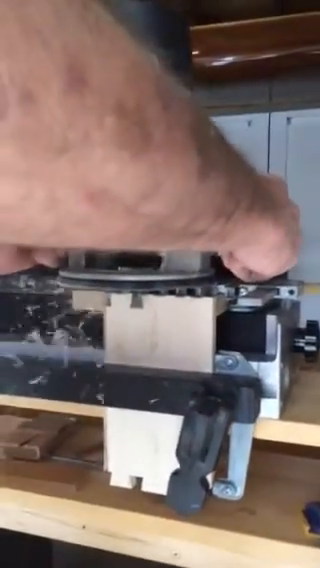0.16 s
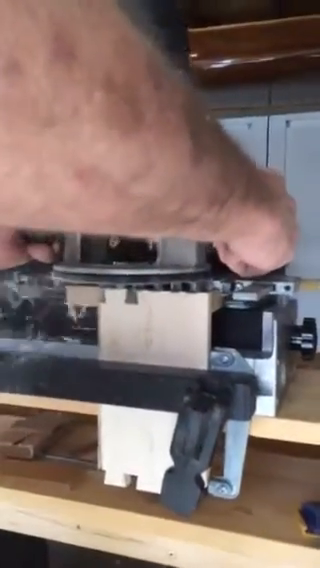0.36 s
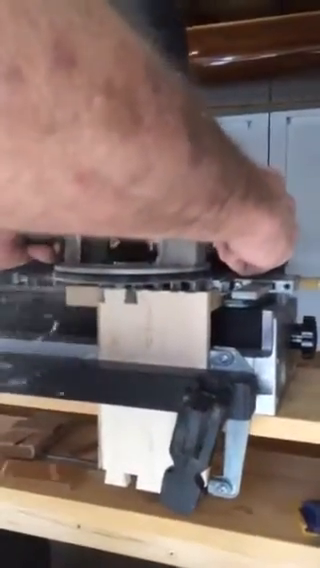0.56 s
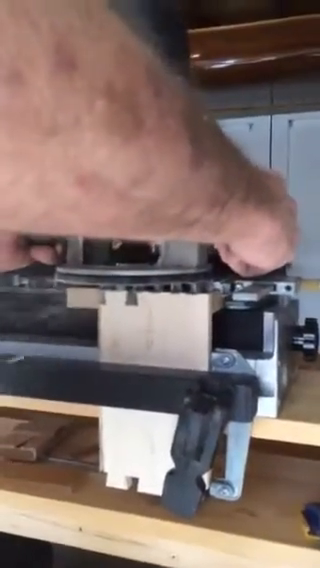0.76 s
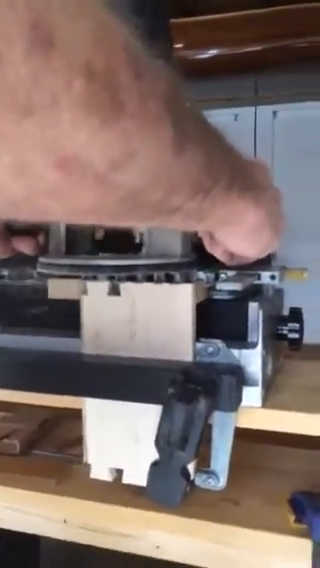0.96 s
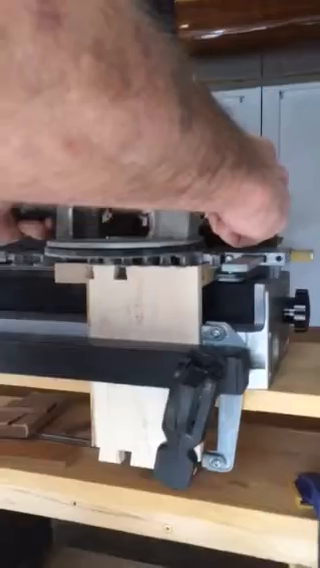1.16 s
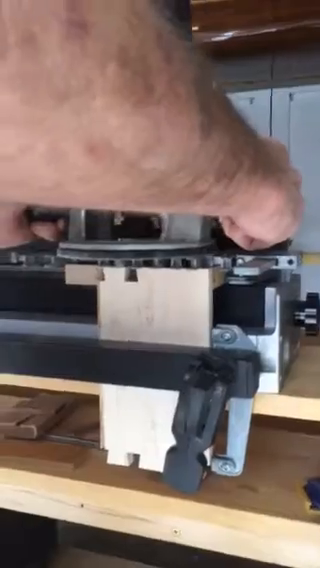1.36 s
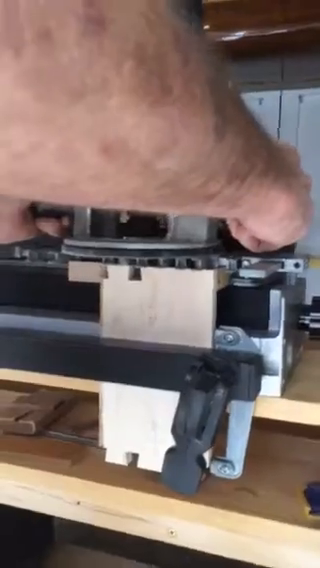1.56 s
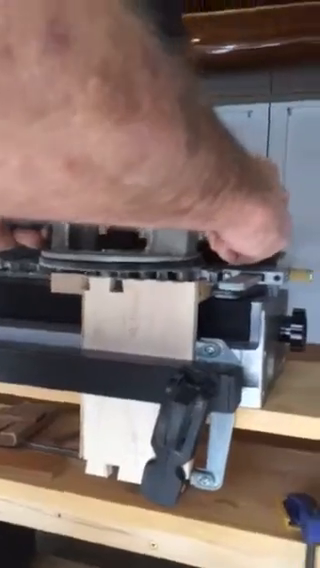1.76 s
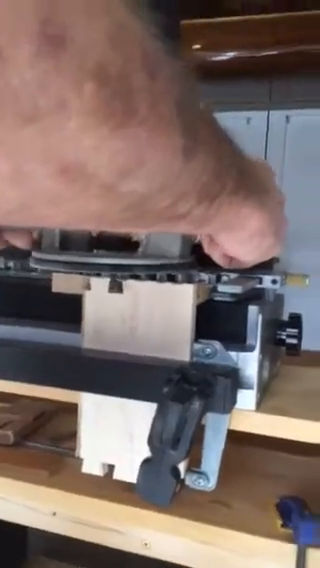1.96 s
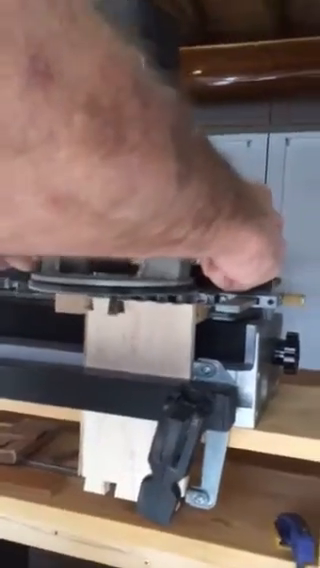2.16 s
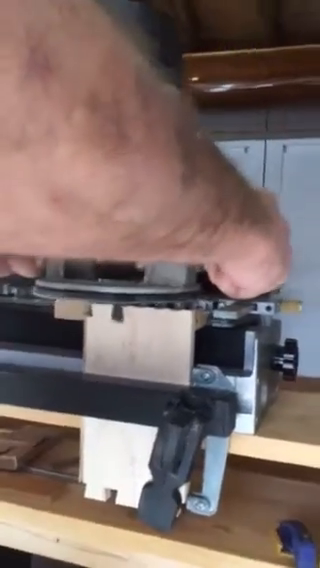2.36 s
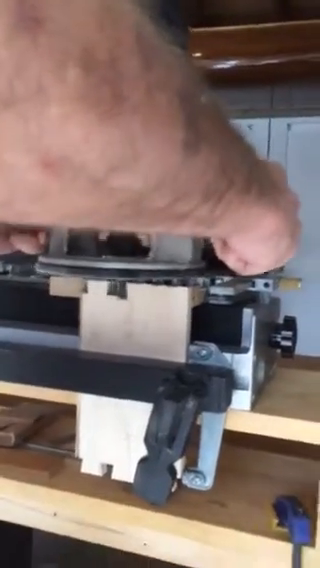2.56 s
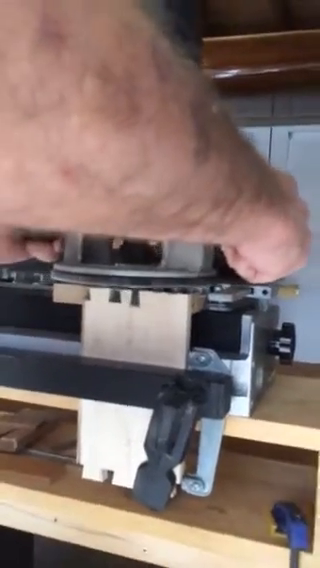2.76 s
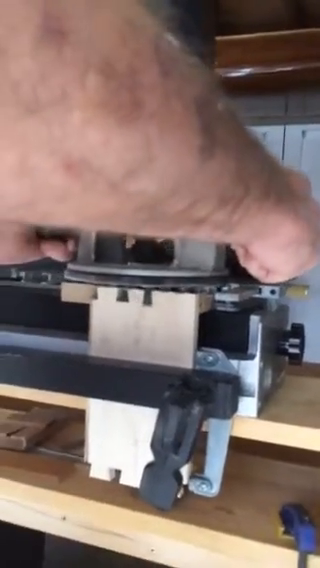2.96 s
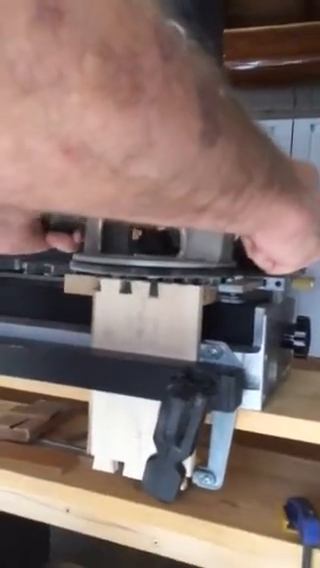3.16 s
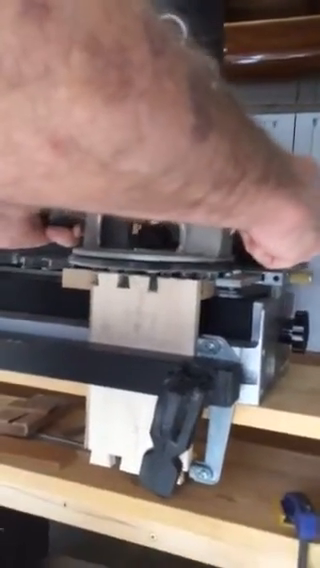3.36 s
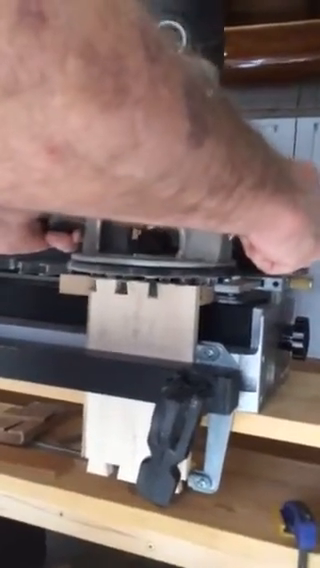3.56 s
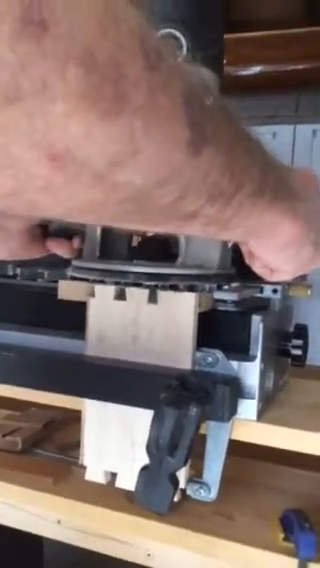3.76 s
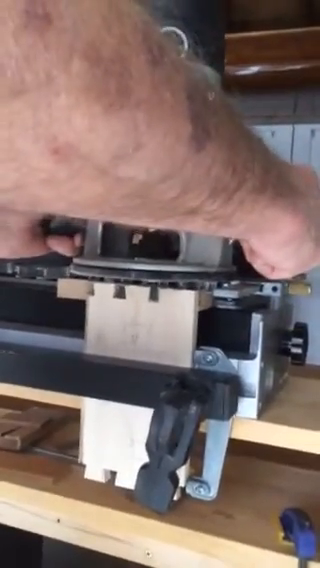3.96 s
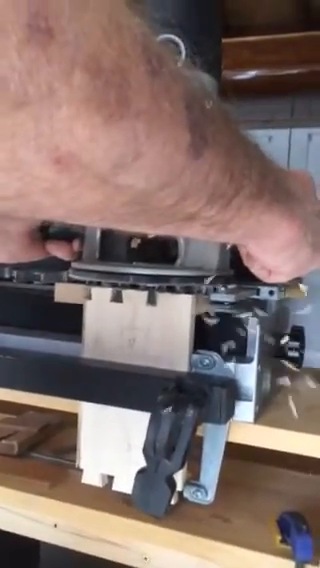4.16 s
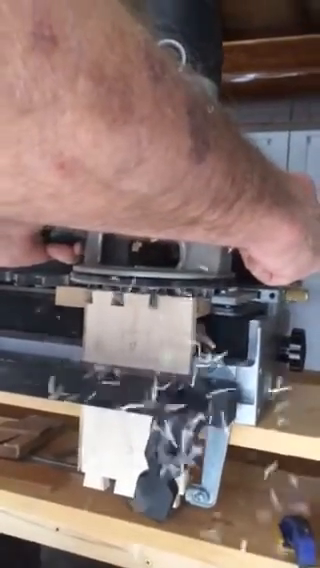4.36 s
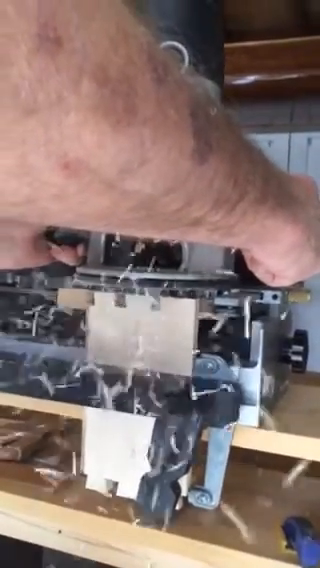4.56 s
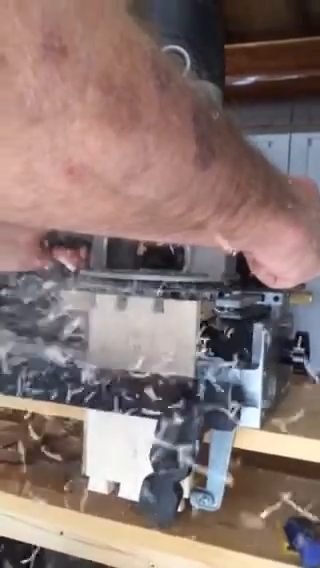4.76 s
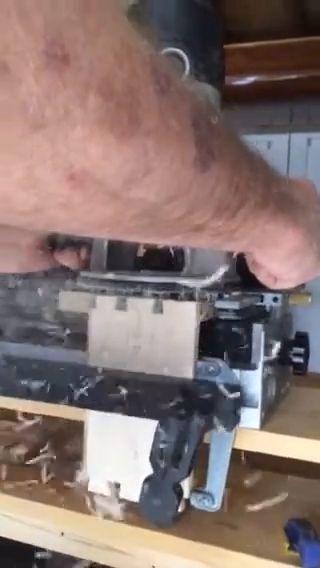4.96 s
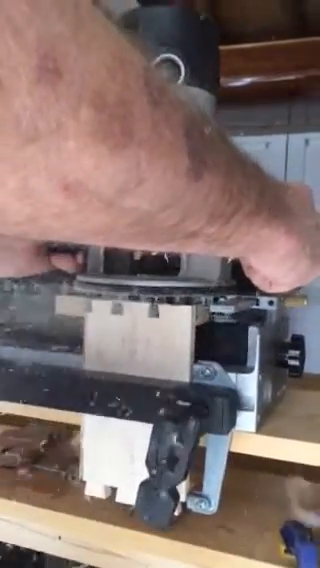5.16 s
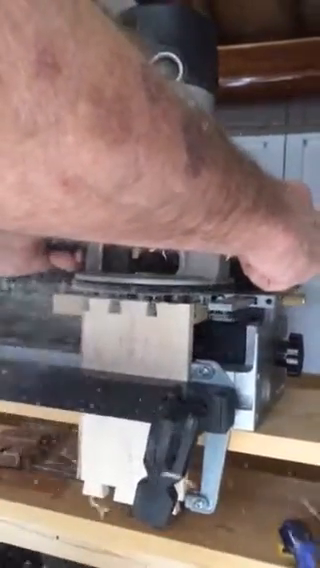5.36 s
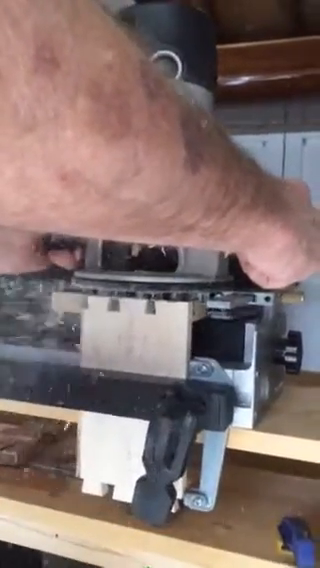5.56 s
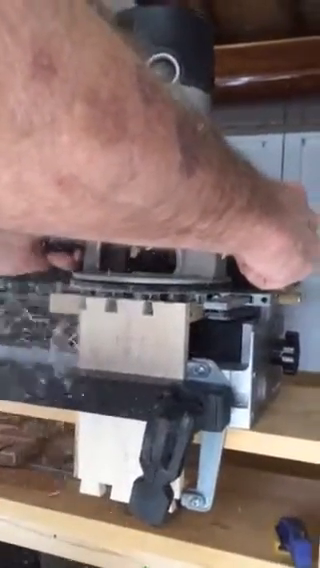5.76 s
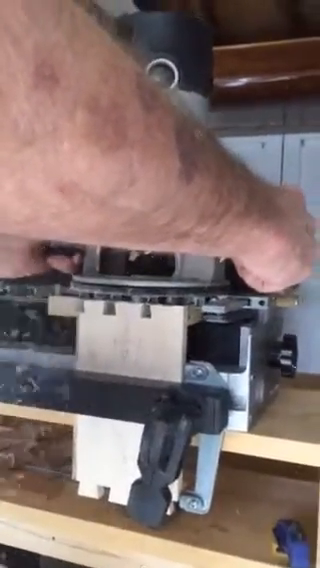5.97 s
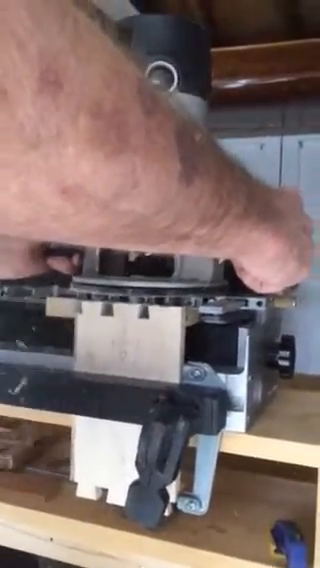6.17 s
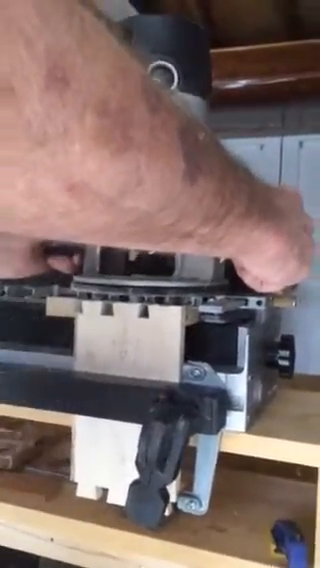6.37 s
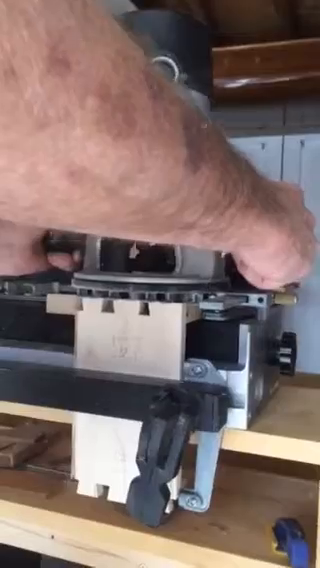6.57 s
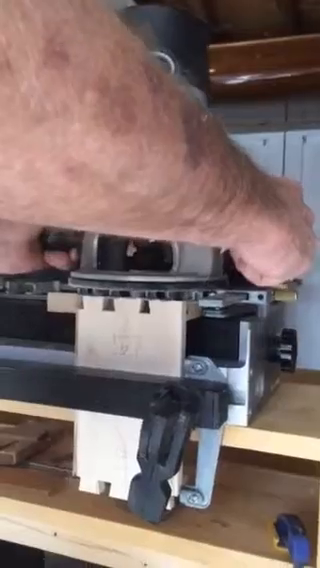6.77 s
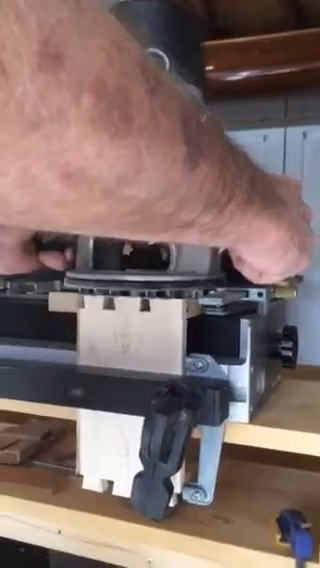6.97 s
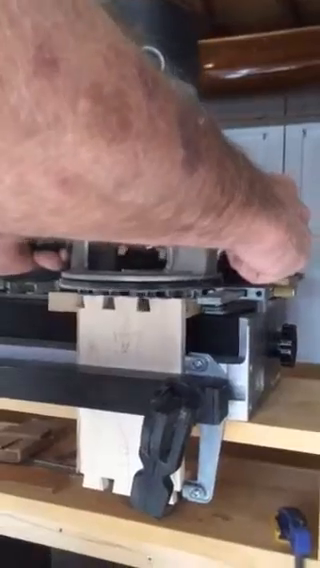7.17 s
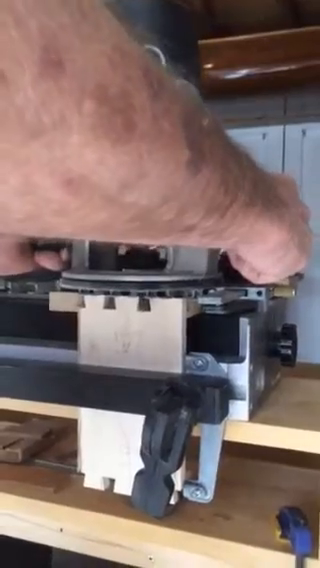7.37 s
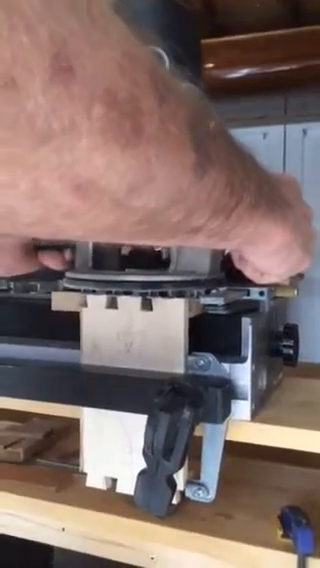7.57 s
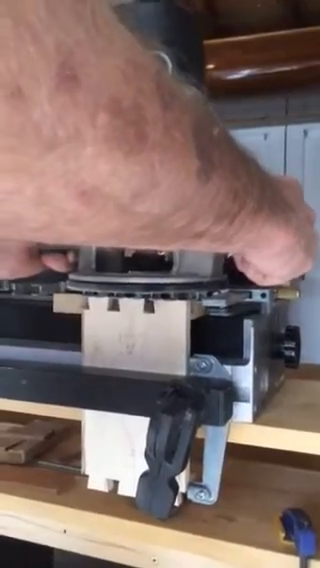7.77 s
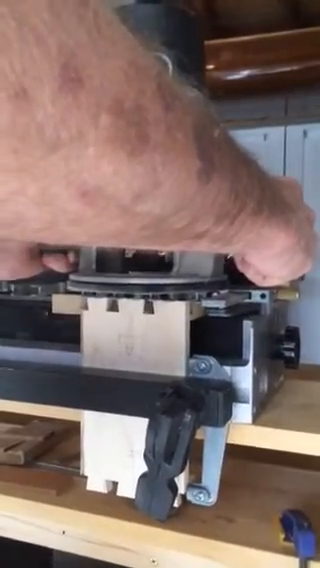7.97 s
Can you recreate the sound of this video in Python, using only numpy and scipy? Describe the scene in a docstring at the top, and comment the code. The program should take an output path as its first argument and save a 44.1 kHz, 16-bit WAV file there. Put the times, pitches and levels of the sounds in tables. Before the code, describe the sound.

Close in a small workshop, a handheld router runs at full speed, with rushing air and a high fan whistle. Light cuts buzz and rasp at first, then it idles with one brief graze. Past the middle the bit digs deep: the motor sags and a harsh, rattling squeal swells and breaks up. A short squeak, scrape and dull bump end the cut, and the steady whine returns. Phone microphone, dry and slightly compressed.

```python
"""A handheld router cuts slots in a clamped board: the shaft turns at up to 488 Hz and every tone follows its angle.
Air roars through the housing as filtered noise; unbalance hums once a turn and a 17-blade fan whistles.
Light cuts with the two-flute bit buzz at multiples of the shaft speed; in the deep cut the motor sags and the bit
chatters near 5 kHz, as a swelling squeal with rattling sidebands. Then the guide squeaks as a cluster of harmonics,
and the base bumps against the jig with decaying low modes and a burst of scraping noise."""
import sys
import numpy as np
from scipy import signal
from scipy.io import wavfile
from scipy.ndimage import uniform_filter1d

SR = 44100
rng = np.random.default_rng(int(sys.argv[2]) if len(sys.argv) > 2 else 0)


def to_wav(sig):
    """Store sig (one row per channel, or 1-D mono) as 16-bit WAV at the path in sys.argv[1].

    Samples outside -1..1 are clipped; the rate is SR.
    """
    pcm = np.clip(np.atleast_2d(sig), -1, 1) * 32767
    pcm = np.round(pcm).astype(np.int16)
    wavfile.write(sys.argv[1], SR, pcm.T)  # frames by channels


N = 353682
TIME = np.arange(N) / SR


def undb(db):
    """Amplitude ratio of a level: 20 dB is a factor of ten."""
    return 10 ** (np.asarray(db) / 20)


def unit(x):
    """Normalisation by the root mean square, which becomes 1."""
    return x / np.sqrt(np.mean(x ** 2))


def curves(table, at=TIME):
    """Linear interpolation in time of each column of a table."""
    time_s, *columns = np.transpose(table)
    return [np.interp(at, time_s, column) for column in columns]


def bell(x, centre, width):
    """Gaussian resonance curve of height 1, with the given full width at half height."""
    return .5 ** ((2 * (x - centre) / width) ** 2)


def flutter(rate):
    """Slow random modulation: `rate` random values a second joined by straight lines, rms 1."""
    place = TIME * rate
    values = rng.standard_normal(N // 16)
    return unit(np.interp(place, np.arange(len(values)), values))


def band(lo_hz, hi_hz):
    """Band-limited noise: white noise through a bandpass filter, rms 1."""
    edges_hz = [lo_hz, min(hi_hz, SR / 2 - 1)]
    bandpass = signal.butter(2, edges_hz, "band", fs=SR, output="sos")
    return unit(signal.sosfilt(bandpass, rng.standard_normal(N)))


def partials(lines, rough, rate):
    """Additive synthesis of (angle, dB) lines, rms 1; each wavers in size and phase on its own."""
    out = 0
    for angle, db in lines:
        wavering_angle = angle + rng.uniform(0, 2 * np.pi) + rough * flutter(rate)
        amplitude = undb(db) * (1 + rough * flutter(rate))
        out = out + amplitude * np.sin(wavering_angle)
    return unit(out)


def comb(shaft, levels, origin=0):
    """Line spectrum of a periodic drive: (angle, dB) at whole multiples of the shaft angle from an origin."""
    return [(origin + round(k) * shaft, db) for k, db in levels.items()]


def gate(start, length, attack, release):
    """Trapezoidal envelope: rises over `attack` s, holds to `length` s after the start, falls over `release` s."""
    age = TIME - start
    return np.clip(np.minimum(age / attack, 1 - (age - length) / release), 0, 1)


def lagged(x, lag_s):
    """First-order lag: exponential approach to x with the given time constant."""
    keep = np.exp(-1 / (lag_s * SR))
    return signal.lfilter([1 - keep], [1, -keep], x)


def motor_speed():
    """Rotor inertia: drag of the cut [Hz] lowers the shaft speed [Hz], which sags and recovers with a lag."""
    # pushes of the bit into the board:
    # (start [s], length [s], build-up [s], let-off [s], drag on the shaft [Hz])
    pushes = [(-0.291, 1.233, 0.793, 0.254, 20.704), (4.067, 1.294, 0.511, 0.752, 47.027),
              (5.565, 0.422, 0.241, 0.001, 12.577)]
    idle_hz, lag_s = 487.85, .958
    first_sag_hz = 3.3  # the speed is still a little low at the start
    drag = sum(hz * gate(*shape) for *shape, hz in pushes)
    return drag, idle_hz - lagged(drag, lag_s) - first_sag_hz * np.exp(-TIME / lag_s)


def eddies(shape, bins, frames):
    """Turbulent eddies: noise smoothed twice over frequency and time into slow random patches, rms 1."""
    field = rng.standard_normal(shape)
    for size, axis in 2 * [(bins, 0), (frames, 1)]:
        field = uniform_filter1d(field, size, axis=axis, mode="wrap")
    return unit(field)


def air(patchy_db=1.65, lumpy_db=1.59):
    """Turbulence noise rings cavities; vent and gap resonances shift as the base slides over the jig."""
    # spectra of the air's roar and hiss, before gain: (frequency [Hz], relative level [dB])
    roar_spectrum = [(25, -57), (70, -28), (130, -24), (185, -14.5), (275, -22.5), (400, -13.5), (600, -11),
                     (1150, -7.5), (2200, -7), (3000, -11.5), (6000, -16.5), (9000, -24.5), (16000, -32)]
    hiss_spectrum = [(1000, -42), (3000, -9), (5000, 1.5), (8000, 4.5), (9000, 2.5), (11500, -0.5),
                     (15000, 0)]
    # resonances of housing and base: (frequency [Hz], width [Hz], boost [dB])
    cavity_modes = [(331, 34, 4.5), (850, 280, 9.5), (3340, 480, 3.5), (4610, 860, 5.5), (5500, 410, -1.5),
                    (6220, 200, 3.5), (7400, 820, 2.5)]
    # moving colour: (time [s], vent resonance [Hz], its boost [dB],
    # resonance of the gap under the base [Hz], its boost [dB], hiss gain [dB])
    airway = [(0, 1570, 10, 6900, 2, -24), (1.2, 1590, 7, 6800, 2.5, -23.5),
              (1.9, 1610, 10.5, 6600, 6, -24), (2.3, 1490, 8, 7260, -2.5, -22),
              (2.7, 1410, 7, 9500, 3, -22.5), (3.5, 1440, 9, 7500, 0.5, -22.5),
              (4.35, 1480, 10.5, 7450, -0.5, -21), (5.1, 1470, 8, 7000, -3, -20),
              (6.3, 1480, 8.5, 7200, -1.5, -22.5), (7, 1470, 9.5, 7100, -2.5, -20.5),
              (8.02, 1480, 8, 7000, 0, -21.7)]
    roar_db, vent_width_hz, gap_width_hz = -7, 516, 1100
    frame = 1024  # samples

    hz, frame_times, noise = signal.stft(rng.standard_normal(N), SR, nperseg=frame)
    vent_hz, vent_db, gap_hz, gap_db, hiss_db = curves(airway, frame_times)
    hz = hz[:, None] + 1  # keeps the logarithm finite at 0 Hz

    def spectrum_db(table):
        """Spectral envelope: levels joined by straight lines over log frequency."""
        table_hz, table_db = np.transpose(table)
        return np.interp(np.log(hz), np.log(table_hz), table_db)

    cavities_db = sum(db * bell(hz, centre, width) for centre, width, db in cavity_modes)
    sliding_db = vent_db * bell(hz, vent_hz, vent_width_hz) + gap_db * bell(hz, gap_hz, gap_width_hz)
    lumps_db = lumpy_db * eddies(noise.shape, bins=2, frames=7)
    patches_db = patchy_db * eddies(noise.shape, bins=6, frames=14)
    roar = undb(spectrum_db(roar_spectrum) + roar_db + lumps_db)
    hiss = undb(spectrum_db(hiss_spectrum) + hiss_db + patches_db)
    coloured = noise * np.hypot(roar, hiss) * undb(cavities_db + sliding_db)
    return signal.istft(coloured, SR, nperseg=frame)[1][:N]


def motor(shaft):
    """Rotating unbalance hums once a turn; the fan whistles at its blade-passing frequency."""
    # unbalance hum: (time [s], level [dB])
    hum_levels = [(0, -40.5), (.5, -47), (.85, -36.5), (1.3, -34.5), (1.6, -53), (2.1, -39), (2.7, -38.5),
                  (3.7, -46), (4.4, -35.5), (4.85, -42.5), (5.15, -30), (6.02, -33), (6.17, -52),
                  (6.3, -32.5), (6.9, -32), (7.45, -49), (8.02, -52)]
    # fan whistle: (time [s], level [dB])
    whistle_levels = [(0, -25), (.5, -32), (.72, -23.5), (1.45, -24.5), (1.85, -21.5), (2.27, -22.5),
                      (2.65, -42), (3.05, -28), (3.6, -22.5), (4.2, -23), (4.5, -27), (5.4, -29),
                      (6.35, -34.5), (6.95, -23), (7.35, -24.5), (8.02, -25.5)]
    (hum_db,), (fan_db,) = curves(hum_levels), curves(whistle_levels)
    blades = 17
    hum = partials([(shaft, 0)], rough=0.17, rate=30)
    whistle = partials([(blades * shaft, 0)], rough=0.14, rate=70)
    return undb(hum_db) * hum + undb(fan_db) * whistle


def contact():
    """Powers of bites and light grazing add: gains of beat, octave, rasp, board and bit, and bit pitch [Hz]."""
    # light grazing between bites: (flute beat [dB], its octave [dB], rasp [dB], board ring [dB], bit ring [dB])
    graze_db = (-38.5, -39, -35, -59, -41)
    # the bit catches the wood: (start [s], length [s], flute beat [dB], its octave [dB], rasp [dB],
    # board ring [dB], bit ring [dB], pitch of the bit ring [Hz])
    bites = [(0.137, 0.28, -38, -29, -28, -39, -31.5, 5170),
             (0.397, 0.35, -50, -28.5, -33, -30.5, -32, 4900),
             (0.754, 0.51, -38, -28.5, -28.5, -41, -29.5, 4850),
             (1.838, .11, -44, -40, -34, -50, -26.5, 4950), (4.23, 0.15, -18.5, -26, -35, -32, -33, 5550),
             (4.372, 0.17, -30, -34, -27, -28, -24.5, 5100), (4.488, 0.13, -18, -37, -28, -33, -27, 5070),
             (4.624, .08, -30, -46, -21, -34, -38, 5100), (4.72, 0.19, -20.5, -35, -28, -27, -46, 5100),
             (5.825, 0.14, -42, -31, -23, -27, -30, 5200), (5.978, 0.078, -45, -44, -21.5, -40, -25, 5300),
             (6.055, 0.064, -40, -44, -32, -24, -25, 5150), (6.18, 0.45, -39, -50, -35.5, -58, -39, 5100),
             (6.817, .11, -30, -48, -33, -26.5, -30, 4900), (7.45, 0.6, -38, -45, -48, -50, -35, 5200)]
    graze_ring_hz, attack_s, release_s = 5160, 0.051, 0.073
    power = undb(graze_db)[:, None] ** 2 * np.ones(N)
    weighted_pitch = graze_ring_hz * power[-1]
    for start, length, *levels_db, ring_hz in bites:
        bite = (undb(levels_db)[:, None] * gate(start, length, attack_s, release_s)) ** 2
        power = power + bite
        weighted_pitch = weighted_pitch + ring_hz * bite[-1]
    return np.sqrt(power), weighted_pitch / power[-1]


def bit_ring(shaft, speed_hz, ring_hz, overtone_db=-9):
    """Forced resonance: the shaft harmonics that lie nearest the bit's resonance stand out."""
    # weak overtones: {multiple of shaft speed: relative level [dB]}
    bit_overtones = {16: -3, 19: 0, 20: -1, 21: 0, 22: -1}
    bit_width_hz = 840
    ring = 0
    for k in range(9, 14):
        line = partials([(k * shaft, 0)], rough=.16, rate=35)
        ring = ring + bell(k * speed_hz, ring_hz, bit_width_hz) * line
    overtones = partials(comb(shaft, bit_overtones), rough=0.33, rate=29)
    return unit(ring) + undb(overtone_db) * overtones


def cutting(shaft, speed_hz, drag, tearing_db=-5):
    """Periodic impact: two flutes strike each turn; uneven bites rasp and set board and bit ringing."""
    # lines excited by the cutting edges: {multiple of shaft speed: relative level [dB]}
    rasp_lines = {3: -2, 5: 0.86, 6: -1.6, 8: -4.5, 9: -5.5, 13: -5.5}
    # ring of the board: {multiple of shaft speed: relative level [dB]}
    board_lines = {7: 0, 14: -30, 21: -28}
    loaded_beat_db = -27  # extra beat at the heaviest drag
    (beat_gain, octave_gain, rasp_gain, board_gain, bit_gain), ring_hz = contact()
    flutes = 2 * shaft

    loaded_gain = undb(loaded_beat_db) * drag / drag.max()
    beat = np.hypot(beat_gain, loaded_gain) * partials([(flutes, 0)], rough=0.1, rate=47)
    octave = octave_gain * partials([(2 * flutes, 0)], rough=0.21, rate=50)
    rasp = rasp_gain * partials(comb(shaft, rasp_lines), rough=0.24, rate=35)
    board = board_gain * partials(comb(shaft, board_lines), rough=0.14, rate=52)
    # fibres tear in one short burst at each stroke of a flute
    bursts = np.exp(1.2 * np.cos(flutes)) * undb(2.5 * flutter(300))
    tearing = unit(band(2200, 9000) * bursts)
    bit = bit_gain * (bit_ring(shaft, speed_hz, ring_hz) + undb(tearing_db) * tearing)
    return beat + octave + rasp + board + bit


def drone(drag):
    """Narrow-band resonance of the clamped board, whose amplitude grows with the square of the drag."""
    # drone band: (lower edge [Hz], upper edge [Hz], level at the heaviest drag [dB])
    drone_band = (310, 340, -46)
    lo_hz, hi_hz, db = drone_band
    return undb(db) * (drag / drag.max()) ** 2 * band(lo_hz, hi_hz)


def chatter(shaft, pitch, spell, chips_db=-9):
    """Self-excited flexing of the bit near 5 kHz, out of step with the shaft, whose blows add sidebands."""
    # sidebands of the flexing in the squeal, in the board and in the rattle:
    # {offset [shaft speeds]: relative level [dB]}
    squeal_sidebands = {0: 0, 1: -2}
    board_sidebands = {-5: -16, -4: 0}
    rattle_sidebands = {-3: -2.1, -2: 0.31, -1: 0.74, 2: -2}
    # sidebands of its octave in the rattle: {offset [shaft speeds]: relative level [dB]}
    octave_sidebands = {-7: -12, -5: -19, -4: -4, -2: -4.5, -1: -4.5, 0: -5, 1: -12}
    # moments of lost grip: (time [s], width at half depth [s], depth [dB])
    slips = [(5.505, 0.018, 3), (5.548, 0.016, 6), (5.592, .012, 5), (5.639, 0.023, 8), (5.695, 0.021, 20),
             (5.76, 0.043, 6)]
    attack_s, release_s, squeal_swell_db = 0.11, .26, 13
    # board and rattle start this much weaker and build up with this time constant
    build_db, build_s = 7.5, 0.26

    start, length, swell, peak_db, fade_db_per_s, board_db, rattle_db = spell
    ratio, = curves(pitch)
    flex = np.cumsum(ratio * np.gradient(shaft)) + 0.13 * flutter(90)

    # the squeal swells to its peak, then fades at a constant rate in decibels
    past_peak = TIME - start - swell
    rise_db = squeal_swell_db * (past_peak / swell) ** 2
    squeal_db = peak_db - np.where(past_peak < 0, rise_db, fade_db_per_s * past_peak)
    squeal = undb(squeal_db) * partials(comb(shaft, squeal_sidebands, flex), rough=0.12, rate=55)

    board = undb(board_db) * partials(comb(shaft, board_sidebands, flex), rough=0.12, rate=35)
    rattle_lines = comb(shaft, rattle_sidebands, flex) + comb(shaft, octave_sidebands, 2 * flex)
    rattle = partials(rattle_lines, rough=0.27, rate=35)
    chips = undb(chips_db) * band(3900, 6100)
    build = undb(-build_db * np.exp(-np.maximum(TIME - start, 0) / build_s))
    building = build * (board + undb(rattle_db) * (rattle + chips))

    grip = undb(-sum(depth * bell(TIME, time_s, width) for time_s, width, depth in slips))
    strokes = undb(0.8 * flutter(450))  # strokes of uneven depth
    return gate(start, length, attack_s, release_s) * grip * strokes * (squeal + building)


def squeak(shaft):
    """Friction-driven harmonics: the guide rubs metal on metal on the jig, in step with the shaft."""
    # squeak lines: {multiple of shaft speed: relative level [dB]}
    squeak_lines = {12: -6, 14: -6, 16: -10, 18: -5, 24: -2, 26: 1, 28: -8, 30: -10, 32: -1}
    level_db = -22
    envelope = gate(start=5.745, length=.1, attack=.05, release=.025)  # s
    return envelope * undb(level_db) * partials(comb(shaft, squeak_lines), rough=0.3, rate=43)


def bumps(thump_decay=0.0071, scrape_decay=0.026):
    """Impulse response of well damped bench modes, a dull thump, with a short scrape on top; decays in s."""
    # the base meets the jig: (time [s], thump gain [dB], scrape gain [dB])
    impacts = [(5.836, -34.5, -13), (6.17, -43, -43)]
    # modes of the bench: (frequency [Hz], relative level [dB])
    bench_modes = [(78, 1), (125, -2)]
    out, scrape = 0, band(2000, 12000)
    for time_s, thump_db, scrape_db in impacts:
        age = np.maximum(TIME - time_s, 0)
        push = age / thump_decay * np.exp(1 - age / thump_decay)
        thump = push * sum(undb(db) * np.sin(2 * np.pi * hz * age) for hz, db in bench_modes)
        rub = (1 - np.exp(-age / .003)) * np.exp(-age / scrape_decay)
        out = out + undb(thump_db) * thump + undb(scrape_db) * rub * scrape
    return out


def scene():
    """Superposition of sources: one shaft drives every tone of the router; both channels are the same."""
    # chatter pitch as the bit enters, then in the deep cut: (time [s], vibrations per shaft turn)
    entry_pitch = [(4.36, 10.95), (4.56, 10.87), (4.7, 10.87), (4.95, 10.92)]
    deep_pitch = [(4.6, 10.6), (4.7, 10.62), (4.9, 10.684), (5.2, 10.729), (5.4, 10.755), (5.7, 10.825),
                  (5.96, 10.82)]
    # spells of chatter: (start [s], length [s], swell of the squeal [s], squeal at its peak [dB],
    # its fading [dB/s], board ring [dB], rattle [dB])
    spells = [(4.42, 0.28, 0.19, -24, 30, -25, -29), (4.535, 1.21, 0.43, -10.5, 12, -23.5, -17.5)]
    drag, speed_hz = motor_speed()
    shaft = 2 * np.pi * np.cumsum(speed_hz) / SR + 0.011 * flutter(25)  # angle in radians
    running = air() + motor(shaft)
    cut = cutting(shaft, speed_hz, drag) + drone(drag)
    chatters = sum(chatter(shaft, pitch, spell) for pitch, spell in zip((entry_pitch, deep_pitch), spells))
    sound = running + cut + chatters + squeak(shaft) + bumps()
    return np.array([sound, sound])


def record(dry, low_cut_hz=24):
    """Compression and band limits of a phone: thinned deep bass, lagging gain, rounded peaks, cut top."""
    threshold_db, reaction_s = -16.5, 0.28
    share = 0.5  # part of the excess in dB that is taken off
    ceiling, hardness = .75, 6
    top_hz = 15280

    thin = signal.sosfilt(signal.butter(2, low_cut_hz, "high", fs=SR, output="sos"), dry)
    loudness = np.sqrt(lagged(thin ** 2, reaction_s))
    excess = np.maximum(loudness / undb(threshold_db), 1)
    held = thin / excess ** share
    rounded = held / (1 + np.abs(held / ceiling) ** hardness) ** (1 / hardness)
    return signal.sosfilt(signal.ellip(12, .2, 80, top_hz, fs=SR, output="sos"), rounded)


dry = scene()
out = record(dry)
to_wav(out)
```